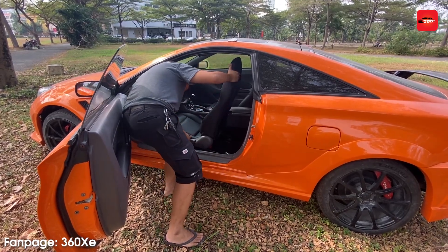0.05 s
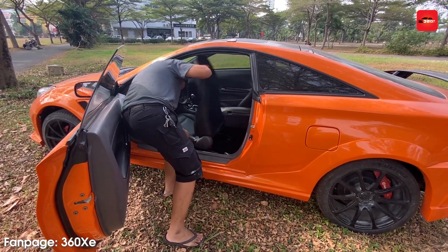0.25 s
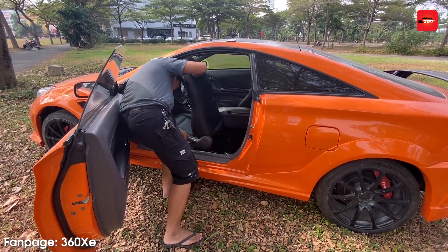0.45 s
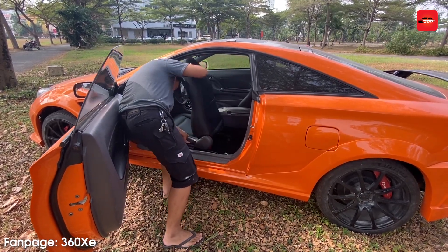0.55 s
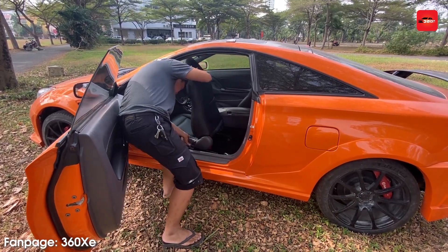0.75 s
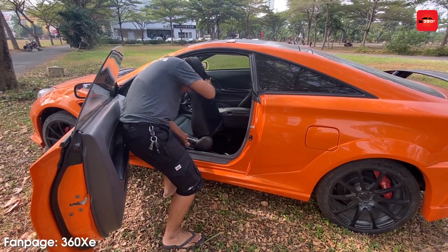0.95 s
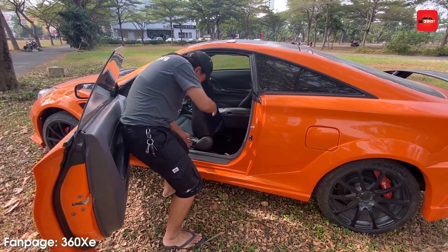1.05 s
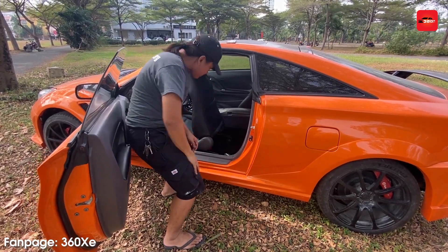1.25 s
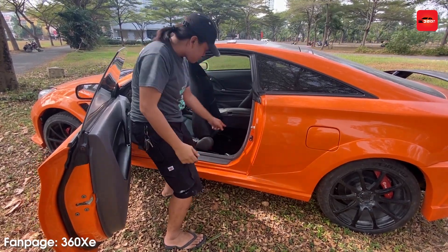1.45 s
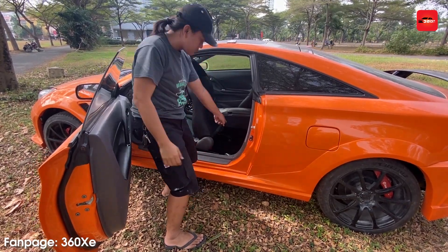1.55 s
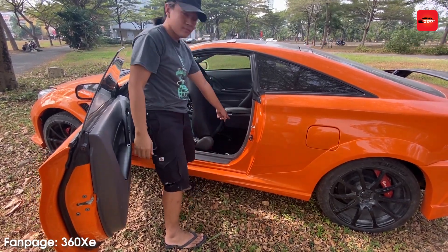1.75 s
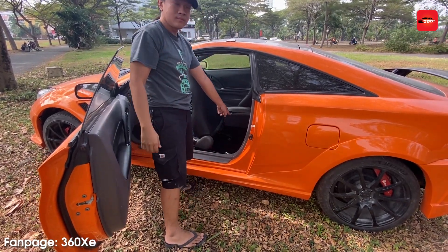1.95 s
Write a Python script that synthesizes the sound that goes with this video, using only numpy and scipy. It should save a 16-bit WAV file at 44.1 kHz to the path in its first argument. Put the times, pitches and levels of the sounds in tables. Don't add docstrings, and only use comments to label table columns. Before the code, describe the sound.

Heavy car seat clunk early on, two close thuds with cloth rubbing and a sharp latch click, ending in a short deep boom. Then only low engine rumble, soft hiss and small leaf crackles, outdoors, in mono.

```python
import sys
import numpy as np
from scipy import signal
from scipy.io import wavfile

SR = 44100
rng = np.random.default_rng(int(sys.argv[2]) if len(sys.argv) > 2 else 0)


def unload_wav(signal):
    wavfile.write(
        sys.argv[1],
        SR,
        np.round(np.clip(np.atleast_2d(signal).T, -1, 1) * 32767).astype(np.int16),
    )


def field_ratio(decibels):
    return 10 ** (np.asarray(decibels, dtype=float) / 20)


N = 88200

# (t/s, f/Hz, level/dB)
DRONE_PATH = [(0, 62.2, -27), (.11, 65.6, -28), (.17, 66.95, -50), (.5, 45.7, -34.5), (.66, 43.73, -23.5),
              (.76, 55, -47), (.83, 45.17, -60), (.9, 44.03, -31.5), (.98, 58.4, -31), (1.04, 63.8, -40),
              (1.24, 62.7, -35), (1.275, 52.9, -53), (1.32, 52.43, -27.5), (1.52, 54.9, -36),
              (1.63, 54.5, -32), (1.74, 49.43, -36), (1.84, 55.35, -24), (2, 52, -37.5)]


def rms_one(x):
    return x / np.sqrt(np.mean(x ** 2) + 1e-20)


def in_time(rows, axis=1):
    rows = np.array(rows)
    return np.interp(np.arange(N) / SR, rows[:, 0], rows[:, axis])


def drift(rate):
    r = np.exp(-80 * np.pi * rate / SR)
    white = rng.standard_normal(N // 40 + 2002)
    slow = signal.lfilter([1], [1, -2 * r, r * r], white)[2000:]
    return np.interp(np.arange(N) / 40, np.arange(len(slow)), rms_one(slow - slow.mean()))


def clicks(s, heights):
    out = np.full(N, 1e-18)
    np.add.at(out, (np.asarray(s) * SR).astype(int), heights)
    return out


def ring(x, hz, t60):
    r, w = field_ratio(-60 / (t60 * SR)), 2 * np.pi * hz / SR
    return signal.lfilter([0, np.sin(w)], [1, -2 * r * np.cos(w), r * r], x)


def soften(x, hz):
    r = np.exp(-2 * np.pi * hz / SR)
    return signal.lfilter([(1 - r) ** 2], [1, -2 * r, r * r], x)


def colour(white, spectrum, patchy_db):
    edges = 110 * 2 ** np.arange(0, 7.6, .5)
    hz, db = np.transpose(spectrum)
    out = 0
    for k, (low, high) in enumerate(zip(edges, edges[1:])):
        band_filter = signal.butter(2, [low, high], "band", fs=SR, output="sos")
        band = signal.sosfilt(band_filter, white[k % 2])
        level = np.interp(np.log(low * high) / 2, np.log(hz), db)
        out = out + band * field_ratio(level + patchy_db * drift(11.0))
    return rms_one(out)


def frame():
    # (t/s, low mode level/dB, upper mode level/dB, small modes level/dB, direction)
    knocks = [(0.203, -16, -19, -19, 1), (0.209, -9.5, -24, -22, 0.84), (0.2235, -28, -11, -51, 0.73),
              (0.2386, -31, -32, -22, -0.83), (0.2469, -37, -13.5, -34, 0.96),
              (0.2521, -37, -21, -21, 0.64), (0.267, -30, -24.5, -21, -1.2),
              (0.2737, -7.5, -11.5, -28, 0.77), (0.3587, -10.5, -26, -25.5, -0.9),
              (0.3617, -8.5, -13.5, -22.5, 0.8), (0.3734, -28, -15.5, -19.5, 0.76),
              (.396, -16, -14, -33, 0.39), (.416, -20, -26, -29.5, 0.92), (.4417, -15, -34, -32, -0.83),
              (0.4464, -19.5, -26.5, -28, -1.06), (0.478, -28, -29, -32.5, 1), (0.529, -35, -33, -41, 0.57)]
    # (f/Hz, level/dB, t60/s)
    small_modes = [(289.5, -7, 0.1), (351.4, -1.5, 0.102), (500, -21, 0.033), (655, -15, 0.044),
                   (785, -15, 0.034), (917, -14, 0.06), (1070, -19, 0.034), (1165, -9.5, 0.085),
                   (1290, -9.5, 0.059), (1470, -26, 0.042), (1760, -7, 0.028), (2040, -8, 0.014)]
    s, low, up, small, way = np.transpose(knocks)
    out = ring(clicks(s, way * field_ratio(low)), hz=162.5, t60=0.067)
    out += ring(clicks(s, way * field_ratio(up)), hz=216, t60=0.086)
    chance = rng.normal(0, 1, (len(s), len(small_modes)))
    for k, (hz, db, t60) in enumerate(small_modes):
        out += ring(clicks(s, field_ratio(small + db) * chance[:, k]), hz, t60)
    return soften(out, hz=1440)


def panel():
    # (f/Hz, t60/s)
    panel_modes = [(392, 0.063), (575, 0.088), (718, 0.072)]
    # (t/s, level/dB of each of the three notes)
    knocks = [(.2040, -43, -24, -32), (.2095, -22, -40, -42), (.2190, -31, -40, -43),
              (.2375, -29, -23, -45), (.2480, -42, -25, -47), (.2665, -35, -29, -28),
              (.2735, -20.5, -21.5, -34.5), (.2850, -38, -34, -40), (.3053, -29, -44, -23),
              (.3610, -43, -18.5, -21), (.3750, -34, -38, -47), (0.395, -23.5, -45, -28.5),
              (.4450, -31, -35, -31)]
    s, *levels = np.transpose(knocks)
    out = 0
    for db, (hz, t60) in zip(levels, panel_modes):
        out = out + ring(clicks(s, field_ratio(db)), hz, t60)
    return soften(out, hz=800)


def cabin():
    # (t/s, deep level/dB, upper level/dB, direction)
    pushes = [(0.236, -22, -15.5, -1.16), (0.247, -17, -30, 0.69), (0.263, -12, -19, -0.83),
              (0.2985, -32, -23, 1), (0.302, -14.5, -23, -1.04), (.372, -20, -11.5, 1),
              (0.394, -2, -24, 0.73), (0.419, -25, -19, -0.81), (.440, -10, -26, 0.044),
              (0.458, -10, -25.5, 0.87), (.492, -30, -28, -1.2), (0.521, -20.5, -56, 0.77)]
    s, deep, up, way = np.transpose(pushes)
    deep_boom = ring(clicks(s, way * field_ratio(deep)), hz=48.7, t60=0.11)
    upper_boom = ring(clicks(s, way * field_ratio(up)), hz=86, t60=0.15)
    return soften(deep_boom + upper_boom, hz=255)


def rub():
    # (t/s, level/dB, brightness/dB)
    efforts = [
        [(.2015, -70, .1), (.203, -31, 2), (.222, -37, 2), (.245, -39, 4.5), (.272, -24, -4.5), (.29, -40, 4),
         (.307, -40.5, 4), (.325, -46, -1)],
        [(.3352, -52, 12), (.3365, -30, 6.5), (.353, -40, 5), (.358, -30.5, 4), (.378, -34, 1.5), (.42, -48, 1),
         (.446, -37.5, -17), (.466, -54, 5), (.486, -41, -22)],
    ]
    # (f/Hz, level/dB)
    rub_colour = [(240, -21), (400, -7.5), (577, -5.5), (653, -9), (1690, -13.5), (2920, -19),
                  (4160, -21.5), (8800, -25.5), (15500, -40)]
    grains_per_s, grain_db, smooth_part, bright_hz = 2500, 4, 0.95, 4850
    hits = rng.random((2, N)) < grains_per_s / SR
    grains = hits * field_ratio(grain_db * np.minimum(rng.exponential(1, (2, N)), 5))
    x = colour(rng.standard_normal((2, N)) * (smooth_part + grains), rub_colour, patchy_db=2.0)
    rows = [(0, -90, 0)] + efforts[0] + efforts[1] + [(.54, -80, 0)]
    dull = soften(x, bright_hz)
    brightness = field_ratio(in_time(rows, axis=2))
    return field_ratio(in_time(rows)) * (dull + brightness * (x - dull))


def latch():
    # (t/s, peak level/dB, t60/s, pitch ratio)
    snaps = [
        (.3049, -16.5, 0.0081, 1.0),
        (.3071, -25, 0.025, 1.0),
        (.3575, -24, 0.026, 1.25),
        (.3595, -24, 0.01, 1.25),
    ]
    # (f/Hz, level/dB)
    latch_modes = [(720, 0), (1000, 1), (1350, 5.5), (1650, -7), (2800, -1), (3300, 1), (3850, -2.5)]
    # (t/s, level/dB, f/Hz, t60/s)
    ticks = [(.2060, -34, 4500, .006), (.2110, -37, 4400, .006), (.2690, -31, 2300, .006),
             (.2745, -31, 2600, .006), (.2535, -35, 2500, .004), (.3768, -33, 10500, .002),
             (.3768, -33, 12200, .002), (.2484, -36, 12000, .003), (.3387, -33, 12500, .003),
             (.2312, -38, 11500, .003)]
    direction = rng.choice([-1, 1], (len(snaps), len(latch_modes)))
    out = 0
    for i, (s, peak_db, t60, ratio) in enumerate(snaps):
        for k, (hz, db) in enumerate(latch_modes):
            height = field_ratio(peak_db + db - 6.5) * direction[i, k]
            out = out + ring(clicks([s], height), hz * ratio, t60)
    for s, db, hz, t60 in ticks:
        out = out + ring(clicks([s], field_ratio(db)), hz, t60)
    return out


def leaves():
    # (t/s, peak level/dB, f/Hz, t60/s)
    crackles = [(1.0420, -25, 3400, .003), (1.0420, -34, 2500, .003), (1.0420, -32, 4700, .0025),
                (1.0420, -42, 9000, .0015), (1.0420, -48, 12800, .0015), (1.2974, -21, 2350, .007),
                (1.2998, -31, 2000, .012), (1.2980, -21, 3600, .007), (1.2982, -32, 880, .014),
                (1.2987, -26, 6600, .005), (1.2925, -36, 2500, .003), (1.2948, -35, 5000, .003),
                (1.2987, -30, 8700, .004), (1.2988, -34, 11800, .004), (1.3006, -28, 3380, .010),
                (1.3011, -33, 8500, .005), (1.3056, -34, 2500, .005), (1.3066, -37, 6500, .004)]
    # (f/Hz, level/dB per Hz)
    crunch_colour = [(500, -33), (900, -2), (3500, -9.5), (6500, -12), (9000, -14), (15000, -34)]
    crunch_s, crunch_db, rise_s, fall_s = 1.299, -35.5, .003, .006
    shuffle_s, shuffle_db, spread_s = 1.286, -52, 0.097
    t = np.arange(N) / SR
    since = t - crunch_s
    crunch = field_ratio(crunch_db) * np.exp(-np.abs(since) / np.where(since < 0, rise_s, fall_s))
    shuffle = field_ratio(shuffle_db) * np.exp(-((t - shuffle_s) / spread_s) ** 2)
    out = (crunch + shuffle) * colour(rng.standard_normal((2, N)), crunch_colour, patchy_db=-5.0)
    for s, db, hz, t60 in crackles:
        out = out + ring(clicks([s], -field_ratio(db)), hz, t60)
    return out


def drone():
    wobble, throb_db, under_db = .14, 4.0, -4.0
    hz = in_time(DRONE_PATH) * (1 + wobble * drift(7.6))
    db = in_time(DRONE_PATH, axis=2) + under_db + throb_db * drift(15.0)
    return np.sqrt(2) * field_ratio(db) * np.sin(2 * np.pi * np.cumsum(hz) / SR)


def traffic():
    # (f/Hz, width/Hz, level/dB)
    rumble_peaks = [(39.6, 14.4, -3), (52.3, 10.5, -4), (79, 27.5, -3), (124.7, 17, -9.5), (149, 31, -13),
                    (205.6, 15, -17.5)]
    # (t/s, level/dB)
    hiss_levels = [(0.0, -45), (0.36, -44), (0.5, -47.5), (0.69, -46), (1.17, -43), (1.4, -43.5),
                   (2.0, -43.5)]
    # (f/Hz, level/dB per Hz)
    air_colour = [(160, 5.5), (280, -1), (1050, -2), (3400, -10.5), (5200, -18.5), (6800, -19.5),
                  (9600, -24.5), (15000, -38)]
    rumble_db, follows = -36.5, 0.15
    low = 0
    for hz, width_hz, db in rumble_peaks:
        r = np.exp(-np.pi * width_hz / SR)
        white = rng.standard_normal(N + SR)
        x = signal.lfilter([1, 0, -1], [1, -2 * r * np.cos(2 * np.pi * hz / SR), r * r], white)
        low = low + field_ratio(db + 0.31 * drift(7.6)) * rms_one(soften(x, 3 * hz)[SR:])
    swell_db = follows * (in_time(DRONE_PATH, axis=2) + 39.5)
    rumble = field_ratio(rumble_db + swell_db) * rms_one(low)
    hiss = field_ratio(in_time(hiss_levels)) * colour(rng.standard_normal((2, N)), air_colour, patchy_db=1.2)
    return hiss + rumble


def scene():
    seat = frame() + panel() + cabin() + rub() + latch()
    return (seat + leaves() + drone() + traffic())[None]


def roll_off(x):
    return signal.sosfilt(signal.butter(12, 15760, fs=SR, output="sos"), x)


def record(dry):
    # (f/Hz, width/Hz, depth 0-1)
    mic_dips = [(4960, 380, 0.57), (10230, 870, 0.33)]
    x = signal.sosfilt(signal.butter(2, 20, "high", fs=SR, output="sos"), dry)
    for hz, width_hz, depth in mic_dips:
        x = x - depth * signal.lfilter(*signal.iirpeak(hz, hz / width_hz, fs=SR), x)
    x = signal.sosfilt(signal.cheby2(20, 60, 15900, fs=SR, output="sos"), x)
    return roll_off(x)


dry = scene()
out = record(dry)
unload_wav(out)
```